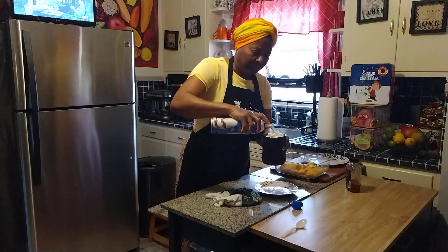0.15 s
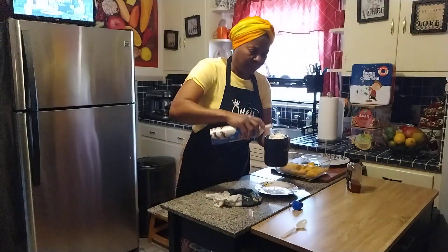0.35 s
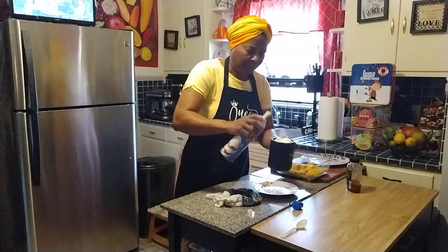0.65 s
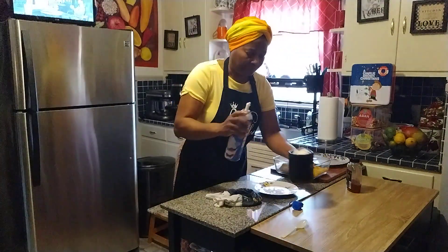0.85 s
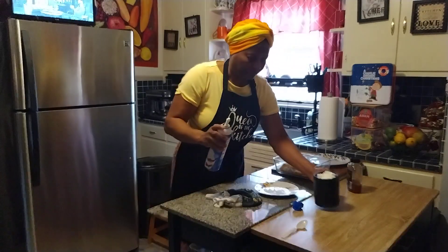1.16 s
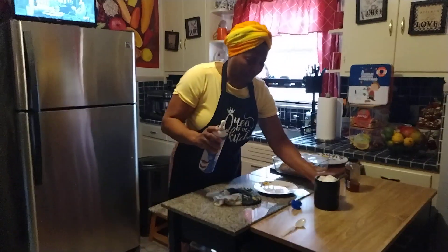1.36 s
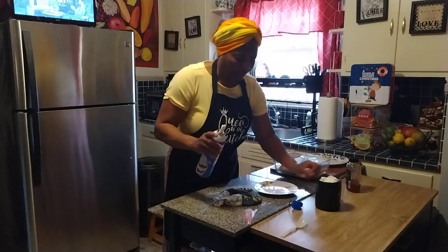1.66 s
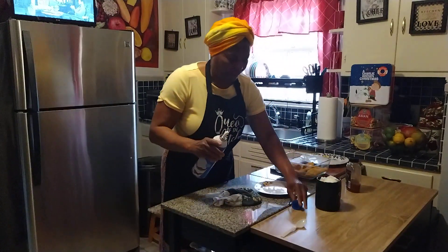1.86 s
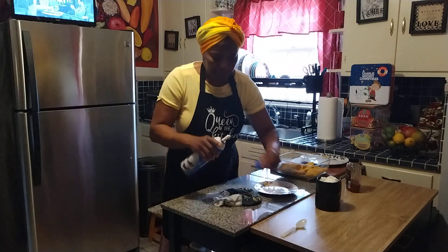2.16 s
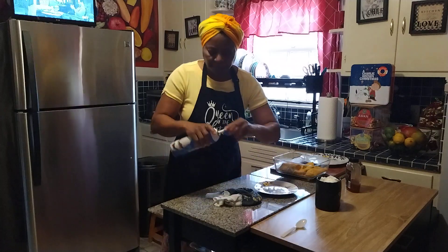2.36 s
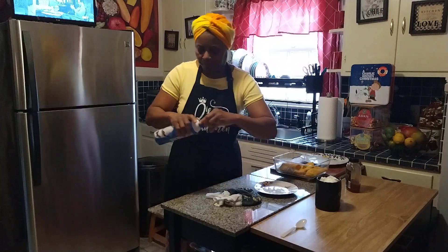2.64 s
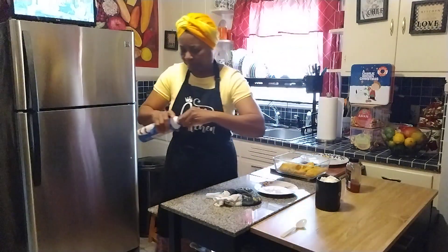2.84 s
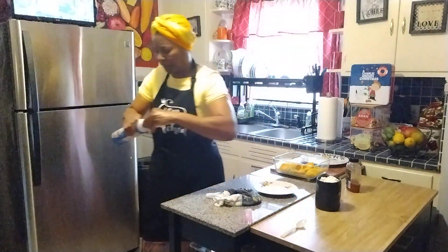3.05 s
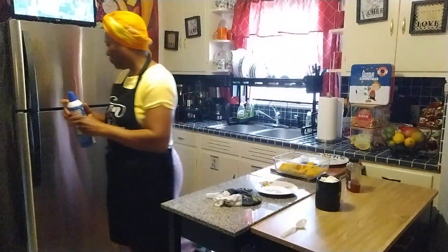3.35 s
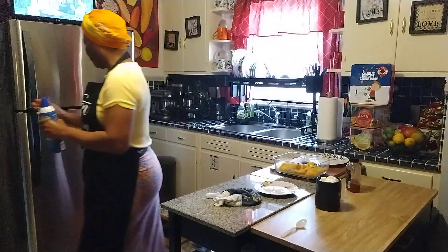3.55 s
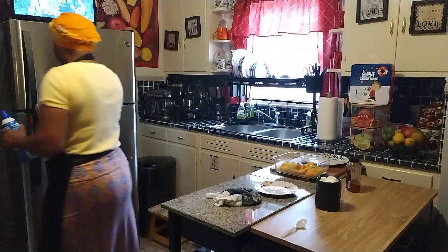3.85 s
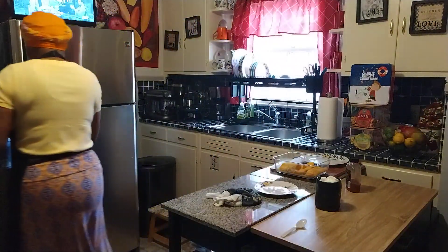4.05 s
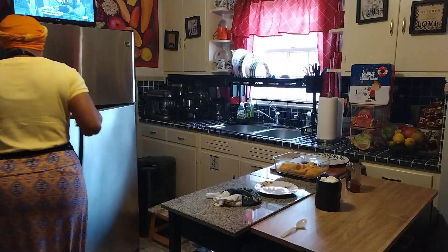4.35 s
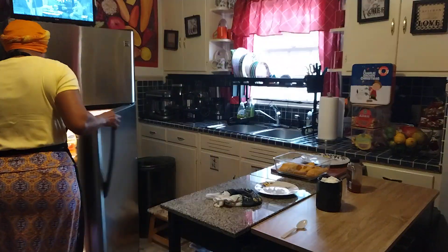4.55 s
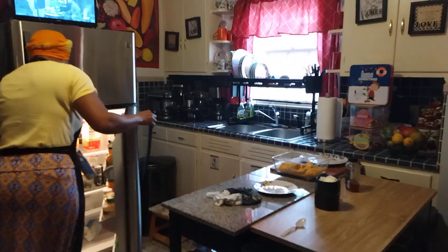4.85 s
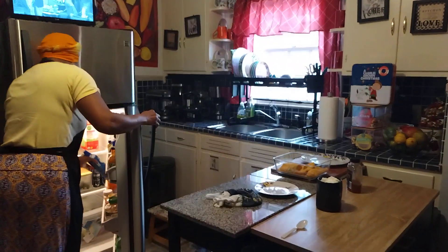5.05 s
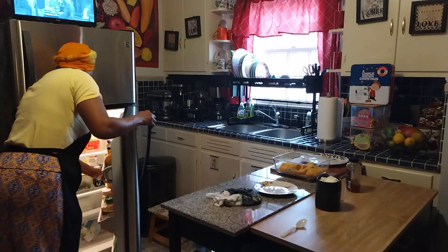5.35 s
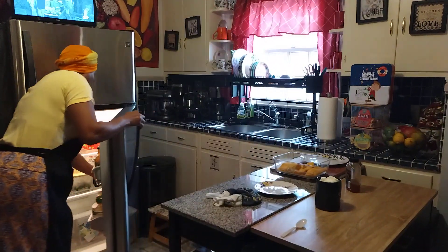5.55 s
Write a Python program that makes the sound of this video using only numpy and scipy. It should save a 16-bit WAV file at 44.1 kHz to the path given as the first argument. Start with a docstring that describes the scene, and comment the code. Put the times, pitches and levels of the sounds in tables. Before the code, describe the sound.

A phone a few steps away in a small, lightly reverberant kitchen picks up a low fridge hum, two woody mug thuds, soft hand rubs, a squeaky cap slide and crisp snap. Then a rubbery crackle and low pop open the fridge, things shift in its door, glass clinks brightly in a quick chatter, and a can slides and knocks onto a plastic shelf as the hum grows louder.

```python
"""A squirt of whipped cream ends over a fridge hum; then a full mug is set down on a wooden table, a plastic cap
is picked up, rubbed and snapped onto the can, the fridge door peels open, glass clinking as it pops, and the can
goes onto a shelf, clinking against jars. The hum swells as the door opens. Blows are noise cracks plus decaying
modes, rubs are uneven noise through a body spectrum, the hum is sines over shaped noise; blows and rubs pass
through a small kitchen's response to a phone a few steps away."""
import sys
import numpy as np
from scipy import signal
from scipy.fft import rfft, irfft, next_fast_len
from scipy.io import wavfile

SR = 44100
rng = np.random.default_rng(int(sys.argv[2]) if len(sys.argv) > 2 else 0)


def materialize(psi):
    """Save the field psi as 16-bit PCM at rate SR to the path in sys.argv[1].

    A 1-D psi becomes a single channel; in a 2-D psi each row is a channel.
    """
    bounded = np.clip(np.atleast_2d(psi).T, -1, 1)
    quanta = np.round(bounded * 32767).astype(np.int16)
    wavfile.write(sys.argv[1], SR, quanta)


N = 251583
SIZE = 32768  # samples in one event
T = np.arange(SIZE) / SR  # s


def amp(db):
    """Amplitude factor of a level in dB."""
    return 10 ** (np.asarray(db) / 20)


def rms(x):
    """Root mean square."""
    return np.sqrt(np.mean(x ** 2))


def add(out, start_s, x):
    """Mix x in at start_s."""
    i = max(int(start_s * SR), 0)
    out[:, i:i + x.shape[-1]] += x[..., :N - i]


def gains(points, size=SIZE):
    """Gain of each frequency bin, interpolated over log frequency from (freq_hz, level_db) points."""
    freq_hz, level_db = np.transpose(points)
    bin_hz = np.arange(size // 2 + 1) * SR / size
    return amp(np.interp(np.log(bin_hz + 1), np.log(freq_hz), level_db))


def body(spectrum, bass_db, treble_db):
    """Causal, minimum-phase response of a touched body; each contact has its own bass and treble."""
    gain = gains(spectrum)
    gain = gain / rms(gain) * gains([(300, bass_db), (1800, 0), (7000, treble_db)])
    cepstrum = irfft(np.log(gain + 1e-6))
    # fold the cepstrum onto positive time
    cepstrum[1:SIZE // 2] *= 2
    cepstrum[SIZE // 2 + 1:] = 0
    return np.exp(rfft(cepstrum))


def diffuse(size=SIZE, apart_hz=900):
    """Spectrum of diffuse noise at two close ports: alike in the bass, unrelated in the treble."""
    mid, side = rfft(rng.standard_normal((2, size)))
    bin_hz = np.arange(len(mid)) * SR / size
    width = np.clip(bin_hz / apart_hz, 0.14, 1) ** 1.25
    return (mid + side * width * np.array([[1], [-1]])) / np.sqrt(1 + width ** 2)


ROOM_T60_S, ROOM_TREBLE_T60_S, DIRECT_DB = 0.34, 0.18, -5.5


def kitchen(left, direct_db, shade_db=0.56):
    """Response from one spot (left 1, right -1): direct sound, then dense reflections that lose treble first."""
    field = diffuse()
    slow_share = gains([(2000, -1.35), (12000, -2.7)])
    slow = irfft(field * slow_share) * amp(-60 * T / ROOM_T60_S)
    fast = irfft(field * (1 - slow_share)) * amp(-60 * T / ROOM_TREBLE_T60_S)
    tail = (slow + fast) * (1 - np.exp(-T / 0.0015))
    response = tail / rms(tail) / np.sqrt(SIZE)
    lag = int(round(6 * left))  # samples by which the far port hears later
    response[0, max(-lag, 0)] += amp(direct_db)
    response[1, max(lag, 0)] += amp(direct_db)
    # the phone's body shades the far port, but not in the bass
    shade = gains([(250, 0.0042), (1000, left * shade_db)])
    return rfft(response) * np.array([shade, 1 / shade]) / np.sqrt(1 + amp(2 * direct_db))


def ring(modes, split=0, count=7):
    """Decaying modes; an uneven shell splits each into close partials, the high ones further apart."""
    rows = np.repeat(modes, count if split else 1, axis=0)
    freq_hz, level_db, t60_s = rows.T[:, :, None]
    spread = split * np.sqrt(freq_hz / freq_hz.min())
    freq_hz = freq_hz * (1 + spread * rng.uniform(-0.95, 1, freq_hz.shape))
    sign = 1 if split else (-1) ** np.arange(len(freq_hz))[:, None]
    partials = sign * amp(level_db - 60 * T / t60_s) * np.sin(2 * np.pi * freq_hz * T)
    return np.sum(partials, axis=0) / np.sqrt(np.sum(amp(2 * level_db)) / 2)  # rms 1 at the start


def knocks(rows, spectrum, modes, left, direct_db, ring_direct_db, split=0):
    """Each blow gives a broad crack and sets the object's modes ringing."""
    out = np.zeros((2, N))
    for start_s, level_db, bass_db, treble_db, ring_db in rows:
        crack = amp(level_db + 34.5) * body(spectrum, bass_db, treble_db) * kitchen(left, direct_db)
        ringing = amp(ring_db) * rfft(ring(modes, split)) * kitchen(left, ring_direct_db)
        add(out, start_s, irfft(crack + ringing))
    return out


def surge(attack_s, hold_s, fade_db_per_s):
    """Envelope that rises, holds and dies away."""
    return np.minimum(T / attack_s, 1) * amp(-fade_db_per_s * np.maximum(T - hold_s, 0))


def friction(pressure, spectrum, bass_db, treble_db, left, grain_db):
    """Uneven micro-slips into a body, as strong as the pressure."""
    grain = np.minimum(rng.exponential(size=SIZE), 6)
    slips = rng.standard_normal(SIZE) * amp(np.clip(grain_db, 0, 8) * grain)
    force = rfft(slips / rms(slips) * pressure)
    return amp(5.5) * irfft(force * body(spectrum, bass_db, treble_db) * kitchen(left, DIRECT_DB))


def rubs(rows, spectrum, left, grain_db):
    """Sliding contact: a short run of uneven micro-slips into the body."""
    out = np.zeros((2, N))
    for start_s, length_s, level_db, bass_db, treble_db in rows:
        pressure = np.sqrt(np.abs(np.sin(np.pi * np.minimum(T / length_s, 1))))
        add(out, start_s, amp(level_db) * friction(pressure, spectrum, bass_db, treble_db, left, grain_db))
    return out


# motor lines: freq_hz, rms_db, open_share (of the open-door gain) [Hz, dB, 1]
MOTOR_LINES = [(299.5, -72, 0.15), (355.9, -61.5, 0.89), (428, -71, 0.58), (476, -74.5, 0.27),
               (707, -68.5, 0.06), (764, -76, 0.2)]
# open-door gain: time_s, gain_db [s, dB]
DOOR_OPEN_GAIN = [(0, 3), (4.3, 5.5), (4.7, 10), (5.7, 13.5)]
# fan rush spectrum: freq_hz, level_db [Hz, dB]
FAN_SPECTRUM = [(22, -21.5), (54, -8), (115, -13), (240, -15), (290, -12), (325, -17.5), (365, -10.5),
                (395, -14), (450, -12.5), (600, -24.5), (720, -17.5), (950, -27.5), (3000, -38.5),
                (14000, -54)]
FAN_DB = -58.5  # before the open-door gain


def fridge_hum(waver_db=1.23, air_share=0.34):
    """Motor lines over the rush of the fan; the open door lets more of both out."""
    t = np.arange(N) / SR
    open_db = np.interp(t, *np.transpose(DOOR_OPEN_GAIN))
    motor = 0
    for freq_hz, level_db, open_share in MOTOR_LINES:
        waver = np.interp(t, np.linspace(0, t[-1], 40), rng.standard_normal(40))
        gain = amp(level_db + open_share * open_db + waver_db * waver)
        motor = motor + gain * np.sqrt(2) * np.sin(2 * np.pi * (freq_hz * t + rng.random()))
    size = next_fast_len(N, real=True)
    air = irfft(diffuse(size) * gains(FAN_SPECTRUM, size), size)[:, :N]
    return motor + air / rms(air) * amp(FAN_DB + air_share * open_db)


# sleeve brushing: start_s, length_s, level_db, bass_db, treble_db [s, s, dB, dB, dB]
SLEEVE_BRUSHES = [(4.24, 0.14, -58, 0, 0)]
# sleeve spectrum: freq_hz, level_db [Hz, dB]
SLEEVE_SPECTRUM = [(600, 5), (1800, -5.5), (2700, 0), (3900, -7), (5500, -15.5), (14000, -29)]


def sleeve_brush():
    """A sleeve slides along as the door swings: soft grainy friction."""
    return rubs(SLEEVE_BRUSHES, SLEEVE_SPECTRUM, left=0.5, grain_db=6.5)


# contents shifting as the door swings and stops: start_s, hold_s, level_db, bass_db, treble_db [s, s, dB, dB, dB]
BIN_SHIFTS = [(4.394, 0.025, -43, 3, 6), (4.52, 0.038, -59, 0, -15), (4.773, 0.03, -49.5, -4, 2)]
# door bin spectrum: freq_hz, level_db [Hz, dB]
BIN_SPECTRUM = [(80, -20), (170, -17), (270, -1), (450, -16.5), (620, 2.5), (900, -9.5), (1500, -11.5),
                (2200, -21), (3900, -25.5), (5500, -37), (13500, -43)]
BIN_FADE_DB_PER_S = 205


def door_bins():
    """Each jolt of the door sets the things in its bins sliding until they settle."""
    out = np.zeros((2, N))
    for start_s, hold_s, level_db, bass_db, treble_db in BIN_SHIFTS:
        shift = amp(level_db) * surge(0.0077, hold_s, BIN_FADE_DB_PER_S)
        add(out, start_s, friction(shift, BIN_SPECTRUM, bass_db, treble_db, left=0.93, grain_db=6.5))
    return out


# handle gripped, last gasket strip freed: start_s, length_s, level_db, bass_db, treble_db [s, s, dB, dB, dB]
HANDLE_AND_STRIP_RUBS = [(3.86, 0.036, -66.5, 12.5, 9), (4.157, 0.045, -44, 1.5, 4)]
# door spectrum, also for peel and pop: freq_hz, level_db [Hz, dB]
DOOR_SPECTRUM = [(13, -12), (25, -14), (60, -13), (95, -1), (275, -5), (413, -9.5), (730, -7), (1200, -18),
                 (2800, -25), (5800, -33.5), (14000, -40)]


def door_rubs():
    """Hand on the handle, then the last strip of gasket: short friction into the door."""
    return rubs(HANDLE_AND_STRIP_RUBS, DOOR_SPECTRUM, left=0.41, grain_db=7.0)


# door panel spectrum: freq_hz, level_db [Hz, dB]
PANEL_SPECTRUM = [(15, -13), (33, -4), (60, -12), (100, -6), (150, -2.5), (275, -4.5), (420, -14),
                  (730, -12), (1500, -26), (14000, -60)]
PEEL_S, PEEL_RISE_S, PEEL_HOLD_S, PEEL_DB, PEEL_FADE_DB_PER_S = 3.926, 0.0055, 0.15, -39, 168
PEEL_TREBLE_DB = 0.5
# the pull reaches the panel a little later and shakes it
PANEL_LAG_S, PANEL_HOLD_S, PANEL_DB, PANEL_FADE_DB_PER_S = 0.038, 0.15, -39.5, 220


def gasket_peel():
    """The rubber crackles as it unsticks and the door panel rumbles; both die away once it is free."""
    out = np.zeros((2, N))
    peel = amp(PEEL_DB) * surge(PEEL_RISE_S, PEEL_HOLD_S, PEEL_FADE_DB_PER_S)
    shake = amp(PANEL_DB) * surge(0.0051, PANEL_HOLD_S, PANEL_FADE_DB_PER_S)
    crackle = friction(peel, DOOR_SPECTRUM, bass_db=-11.5, treble_db=PEEL_TREBLE_DB, left=0.5, grain_db=6)
    rumble = friction(shake, PANEL_SPECTRUM, bass_db=-2, treble_db=2, left=0.95, grain_db=4.5)
    add(out, PEEL_S, crackle)
    add(out, PEEL_S + PANEL_LAG_S, rumble)
    return out


# door popping free: start_s, level_db, bass_db, treble_db, ring_db [s, dB, dB, dB, dB]
DOOR_POPS = [(3.968, -45, 3, -4, -35.5), (4.037, -29, -2, 4, -45), (4.046, -32.5, 0, -11, -27.5),
             (4.087, -43.5, 3.5, -11, -44.5)]
# door modes: freq_hz, level_db, t60_s [Hz, dB, s]
DOOR_RING = [(31.3, 5, 0.13), (96.5, 4, 0.2), (128.4, -1, 0.52), (278, -1, 0.66), (322, -10, 1),
             (511, -8.5, 0.68), (740, -22, 0.2)]


def door_pop():
    """The door pops free: cracks over long, low door modes."""
    return knocks(DOOR_POPS, DOOR_SPECTRUM, DOOR_RING, left=0.71, direct_db=-18, ring_direct_db=2.5)


def fridge_door():
    """The gasket peels and pops free, then a sleeve brushes along and things shift in the swinging door."""
    return door_rubs() + gasket_peel() + door_pop() + sleeve_brush() + door_bins()


# shelf flexing under the can: start_s, push_s, level_db [s, s, dB]
SHELF_PUSHES = [(4.989, 0.029, -20), (5.064, 0.02, -34.5), (5.415, 0.028, -26), (5.552, 0.041, -33.5)]
# plastic shelf modes: freq_hz, level_db, t60_s [Hz, dB, s]
SHELF_RING = [(238.3, 3, 0.16), (262.5, 9, 0.11), (449, -12, 0.17), (890, -20.5, 0.28)]


def shelf_thuds():
    """Soft pushes swell into the low modes of the plastic shelf."""
    out = np.zeros((2, N))
    for start_s, push_s, level_db in SHELF_PUSHES:
        swell = np.minimum(T / push_s, 1) ** 2
        thud = irfft(rfft(ring(SHELF_RING) * swell) * kitchen(1.0, 8.5))
        add(out, start_s, amp(level_db + 9.5) * thud)
    return out


# can sliding on the shelf: start_s, length_s, level_db, bass_db, treble_db [s, s, dB, dB, dB]
SHELF_SLIDES = [(5.402, 0.017, -49, 11.5, -12), (5.482, 0.037, -50, -7, 18), (5.59, 0.073, -53.5, 11, -3)]
# shelf spectrum, also for the landing: freq_hz, level_db [Hz, dB]
SHELF_SPECTRUM = [(70, -43), (150, -6.5), (400, 0), (650, -2.5), (950, 1), (1300, -5.5), (1900, -13),
                  (2400, -21), (4000, -24), (8000, -29), (14000, -35.5)]


def shelf_slide():
    """The can slides along the shelf: short grainy friction."""
    return rubs(SHELF_SLIDES, SHELF_SPECTRUM, left=1.3, grain_db=5.0)


# can set down on the shelf: start_s, level_db, bass_db, treble_db, ring_db [s, dB, dB, dB, dB]
SHELF_LANDINGS = [(5.5115, -27.5, -16.5, -5, -29), (5.526, -38, -13, 6, -35.5)]
# modes rung by the landing: freq_hz, level_db, t60_s [Hz, dB, s]
LANDING_RING = [(915, -1.5, 0.097), (1048, 1, 0.06), (1260, 2, 0.056), (1670, 4, 0.045),
                (1950, -3.5, 0.036), (2810, -9, 0.51), (3634, -14, 0.3), (6000, -16, 0.068)]


def shelf_landing():
    """The can is set down: cracks and split, mostly short modes."""
    return knocks(SHELF_LANDINGS, SHELF_SPECTRUM, LANDING_RING, left=0.72, direct_db=-15.5,
                  ring_direct_db=-9.5, split=0.0112)


CHATTER_S, CHATTER_GAP_S, CHATTER_DB, CHATTER_RING_DB = 4.985, 0.017, -30, -24.5
BOUNCE_LOSS_DB, BOUNCE_RING_LOSS_DB, BOUNCE_BASS_DB = 4, 5, 4  # per bounce


def chatter(bass_db=1.3, treble_db=-12.0, count=4):
    """Blows of the can bouncing on a jar: evenly spaced, each weaker and with relatively more thump."""
    return [(CHATTER_S + k * CHATTER_GAP_S,
             CHATTER_DB - k * BOUNCE_LOSS_DB,
             bass_db + k * BOUNCE_BASS_DB,
             treble_db,
             CHATTER_RING_DB - k * BOUNCE_RING_LOSS_DB) for k in range(count)]


# glass clinking: in the door as it pops free, then can against jars:
# start_s, level_db, bass_db, treble_db, ring_db [s, dB, dB, dB, dB]
GLASS_CLINKS = [(4.06, -62, -7, 0, -40.5), (4.968, -26.5, -16.5, 2.5, -37.5), (4.974, -34, -9, 13, -37.5),
                (5.046, -43.5, -0.5, -8, -38.5), (5.093, -41, -0.5, -5, -47)]
# glass spectrum: freq_hz, level_db [Hz, dB]
GLASS_SPECTRUM = [(70, -19), (150, -5.5), (240, -6.5), (480, 3), (700, -0.5), (1250, -3), (2000, -12.5),
                  (2500, -12), (3200, -22.5), (4300, -31), (5300, -25), (9500, -45), (14000, -40)]
# glass modes: freq_hz, level_db, t60_s [Hz, dB, s]
GLASS_RING = [(2284, 4.5, 0.17), (3420, -17, 0.082), (4923, -11.5, 0.068), (5050, -15.5, .05),
              (5340, -16, 0.088), (5841, -20, 0.097), (7500, -16, 0.058), (7870, -17, 0.078),
              (11000, -25, .04), (12400, -26, .04)]


def glass_clinks():
    """Glass clinks in the door as it pops free, then can against jars: cracks and bright, slightly split modes."""
    return knocks(GLASS_CLINKS + chatter(), GLASS_SPECTRUM, GLASS_RING, left=1.12, direct_db=-30.0,
                  ring_direct_db=1.0, split=0.0035)


def glass_and_shelf():
    """Glass clinks as the door pops; later the can bumps the jars, slides along the shelf and is set down."""
    return glass_clinks() + shelf_landing() + shelf_slide() + shelf_thuds()


def cream_squirt():
    """The last hiss of gas and cream from the nozzle, as a short burst of uneven noise."""
    nozzle = [(200, -23), (700, 3.5), (2500, -0.5), (4500, 0.0), (8000, 0.0), (14000, -4.0)]  # freq_hz, level_db
    return rubs([(0, 0.022, -48.5, 0, 0)], nozzle, left=0, grain_db=2.0)


# hands sliding on can and cap: start_s, length_s, level_db [s, s, dB]
HAND_SLIDES = [(1.764, 0.071, -74), (1.887, 0.063, -61), (2.019, 0.037, -50.5), (2.187, 0.031, -71.5),
               (2.493, 0.061, -52.5)]
# rubbed can and cap spectrum, also for the rim: freq_hz, level_db [Hz, dB]
HAND_SPECTRUM = [(120, -42), (200, -17), (355, -5.5), (381, -20), (740, -9.5), (1240, -9.5), (1750, -11),
                 (3920, -18), (13000, -32.5), (14500, -62)]
HAND_BASS_DB, HAND_EVEN_DB = 6, -56
HAND_DULLING = 0.79  # dB of treble lost per dB above the even level


def hands():
    """Fingers slide on the can and cap; a firm rub is duller than a light one."""
    rows = [(start_s, length_s, level_db, HAND_BASS_DB, HAND_DULLING * (HAND_EVEN_DB - level_db))
            for start_s, length_s, level_db in HAND_SLIDES]
    return rubs(rows, HAND_SPECTRUM, left=0.1, grain_db=3.0)


# rim scraping on the can: start_s, length_s, level_db, bass_db, treble_db [s, s, dB, dB, dB]
RIM_SCRAPES = [(2.645, 0.11, -68.5, 17.5, 13.5), (2.733, 0.03, -54.5, -3, 6.5), (2.785, 0.04, -54.5, -7, 5),
               (2.845, 0.023, -59.5, -2, 3)]


def rim_scrape():
    """The cap's rim scrapes on the can: short grainy friction."""
    return rubs(RIM_SCRAPES, HAND_SPECTRUM, left=0.1, grain_db=6.0)


SLIDE_S, SLIDE_HOLD_S, SLIDE_DB, SLIDE_FADE_DB_PER_S = 2.632, 0.15, -51.5, 140
GAP_OPEN_HZ, GAP_SHUT_HZ, GAP_CLOSING_S = 2370, 1260, 0.052
SQUEAK_HZ, SQUEAK_WIDTH_HZ, SQUEAK_DB = 1610, 100, 8  # squeaks passing a resonance of the shell
SLIP_HZ, SLIP_DB = 70, 4  # the cap catches and slips unevenly


def cap_slide(width_hz=250):
    """Jerky scraping excites the air under the cap; the resonance falls as the gap closes."""
    out = np.zeros((2, N))
    pitch_hz = GAP_SHUT_HZ + (GAP_OPEN_HZ - GAP_SHUT_HZ) * np.exp(-T / GAP_CLOSING_S)
    slips = np.interp(T * SLIP_HZ, np.arange(128), rng.uniform(-1, 1, 128))
    squeak_db = SQUEAK_DB / (1 + ((pitch_hz - SQUEAK_HZ) / SQUEAK_WIDTH_HZ) ** 2)
    level_db = SLIDE_DB + SLIP_DB * slips + squeak_db
    lowpass = signal.butter(2, width_hz / 2, fs=SR, output="sos")
    scrape = signal.sosfilt(lowpass, rng.standard_normal(SIZE))
    # low noise times a gliding sine: a noise band around pitch_hz
    carrier = np.sin(2 * np.pi * np.cumsum(pitch_hz) / SR)
    envelope = amp(level_db) * surge(0.0018, SLIDE_HOLD_S, SLIDE_FADE_DB_PER_S)
    cavity = scrape / rms(scrape) * carrier * envelope
    add(out, SLIDE_S, irfft(rfft(cavity) * kitchen(0, DIRECT_DB)))
    return out


# cap lifted off the table: start_s, level_db, bass_db, treble_db, ring_db [s, dB, dB, dB, dB]
CAP_LIFTS = [(1.969, -46.5, -10, -2, -72)]
# cap rim spectrum: freq_hz, level_db [Hz, dB]
RIM_SPECTRUM = [(300, -33), (1500, -14), (2300, -2.5), (3100, -30), (4200, -0.5), (5600, 0), (8000, -5),
                (10500, -22), (14000, -34)]
# cap modes, also for the snap: freq_hz, level_db, t60_s [Hz, dB, s]
CAP_RING = [(2100, -9, 0.048), (2585, 1.5, 0.043), (2705, -4, 0.057), (3350, -8, 0.061), (5360, 5.5, 0.027),
            (11200, -7, 0.019), (12400, -8, .02), (13800, -6, 0.023)]


def cap_lift():
    """The cap leaves the table: a light crack at its rim and its short modes."""
    return knocks(CAP_LIFTS, RIM_SPECTRUM, CAP_RING, left=-1.1, direct_db=-5, ring_direct_db=-12)


# cap on the can: start_s, level_db, bass_db, treble_db, ring_db [s, dB, dB, dB, dB]
CAP_SNAPS = [(2.636, -49.5, -18, 0.5, -68), (3.0405, -32, -8.5, -0.5, -72), (3.251, -42, -45, 2.5, -32.5)]
# snapping cap spectrum: freq_hz, level_db [Hz, dB]
CAP_SPECTRUM = [(150, -34), (430, -1), (620, -9.5), (820, -4.5), (1400, -5.5), (3700, -12), (5400, -22),
                (8500, -21), (14000, -26.5)]


def cap_snap():
    """The cap clicks home: cracks and split, short plastic modes."""
    return knocks(CAP_SNAPS, CAP_SPECTRUM, CAP_RING, left=0.6, direct_db=-10.0, ring_direct_db=-15, split=0.03)


def cap():
    """The plastic cap is lifted, slid over the nozzle and snapped home."""
    return cap_lift() + cap_snap() + hands() + cap_slide() + rim_scrape()


# mug on the table: start_s, level_db, bass_db, treble_db, ring_db [s, dB, dB, dB, dB]
MUG_BLOWS = [(1.369, -13.5, -4.5, -5, -19.5), (1.3745, -25.5, -9, 9, -26), (1.384, -29, 11.5, 17.5, -11.5),
             (1.4835, -16, -6.5, -4, -22), (1.495, -27, 1, 2, -18)]
# table top spectrum: freq_hz, level_db [Hz, dB]
TABLE_SPECTRUM = [(40, -43), (90, -9.5), (165, -0.5), (200, -9), (250, -0.5), (370, -6), (550, -8),
                  (720, -8.5), (1500, -22), (1870, -23.5), (3800, -35), (5500, -44.5), (8000, -45.5),
                  (14000, -55)]
# table top and, highest, the mug itself: freq_hz, level_db, t60_s [Hz, dB, s]
TABLE_AND_MUG_RING = [(99.2, -2.5, 0.19), (165.5, 1.5, 0.29), (244, 0.5, 0.1), (296, -13, 0.24),
                      (369.7, 4.5, 0.22), (433, -3, 0.14), (497, -12, 0.3), (663, -11, 0.41),
                      (763, -16, 0.16), (812, -11, 0.42), (1040, -20, 0.065), (1233, -10.5, 0.24),
                      (1860, -6, 0.1), (8050, -21, 0.038)]


def mug():
    """The full mug lands: cracks, wooden table modes and one high mode of the mug."""
    return knocks(MUG_BLOWS, TABLE_SPECTRUM, TABLE_AND_MUG_RING, left=-0.8, direct_db=-6.5, ring_direct_db=6.0)


def scene():
    """All sources at the two microphone ports."""
    return fridge_hum() + fridge_door() + glass_and_shelf() + cream_squirt() + cap() + mug()


TOP_HZ = 14300


def record(dry):
    """The phone cuts the top with a steep low-pass."""
    return signal.sosfilt(signal.ellip(10, 0.2, 80, TOP_HZ, fs=SR, output="sos"), dry)


dry = scene()
out = record(dry)
materialize(out)
```